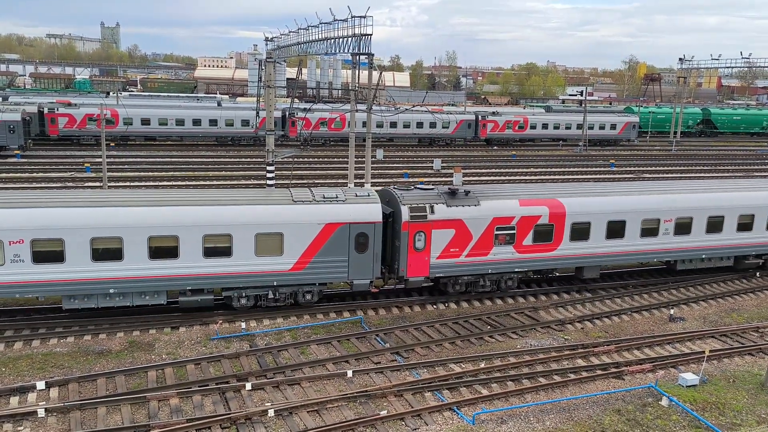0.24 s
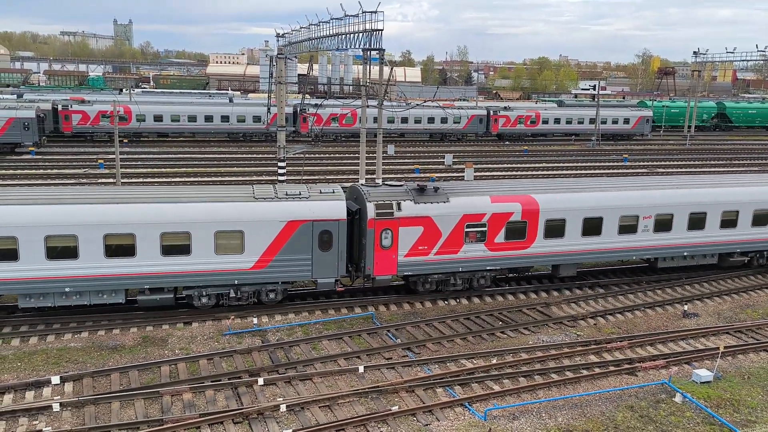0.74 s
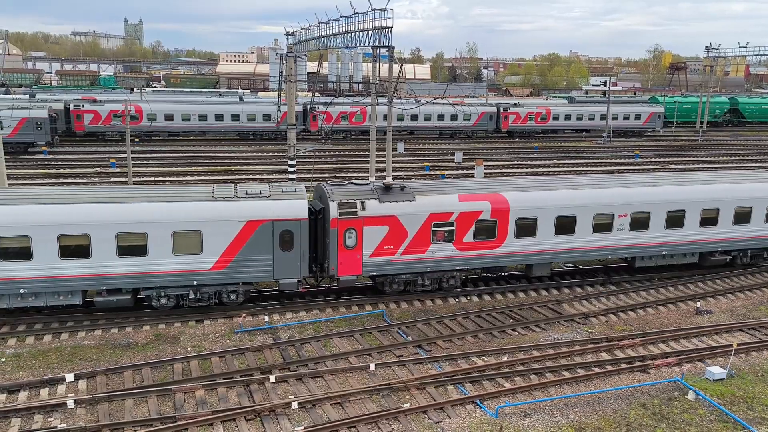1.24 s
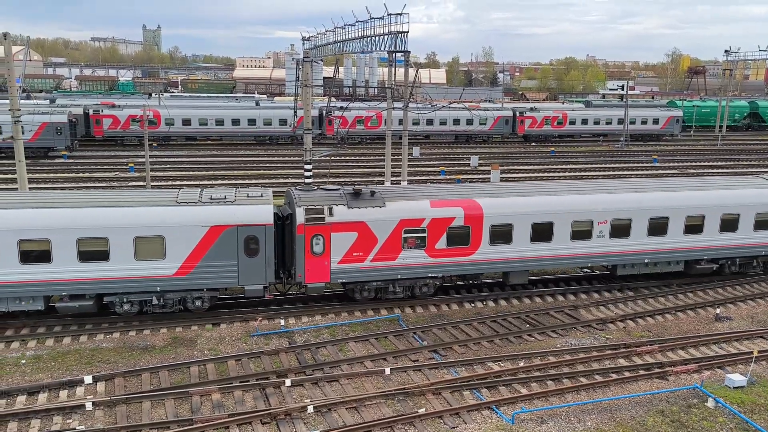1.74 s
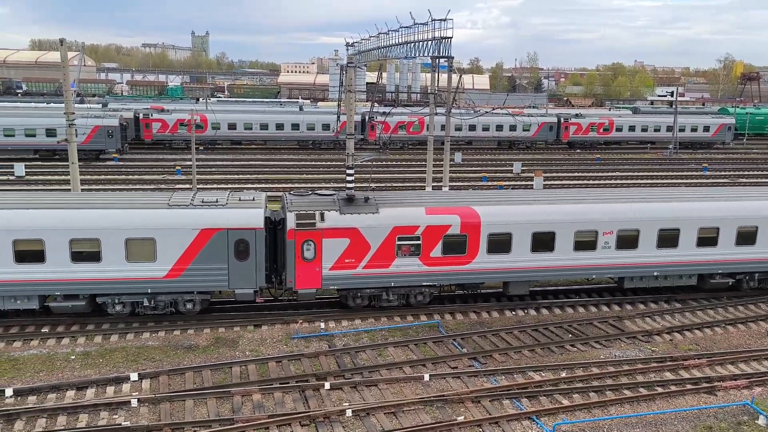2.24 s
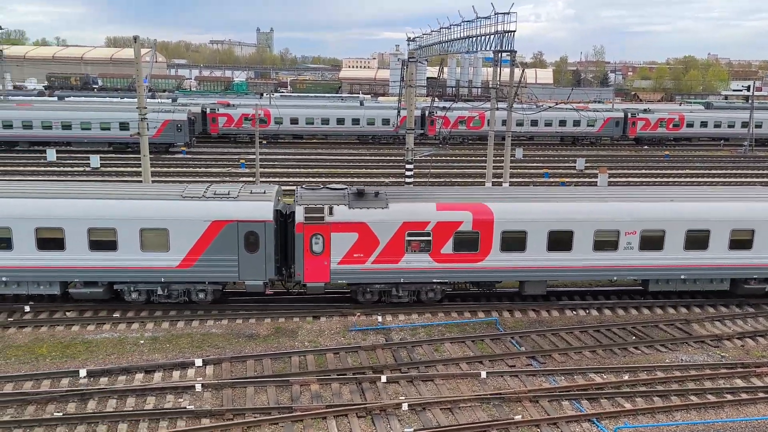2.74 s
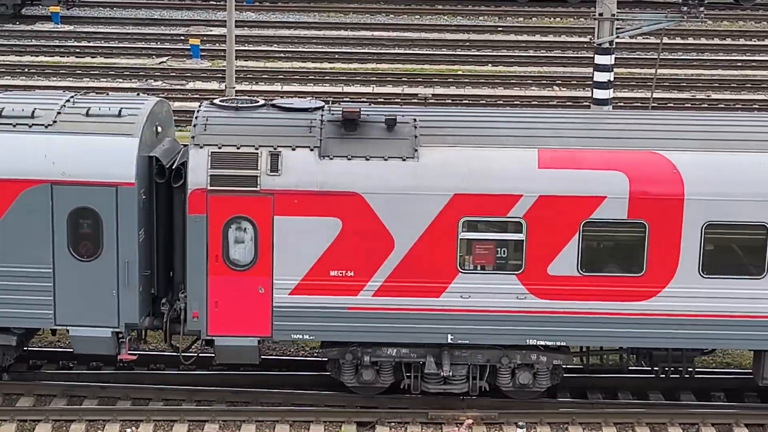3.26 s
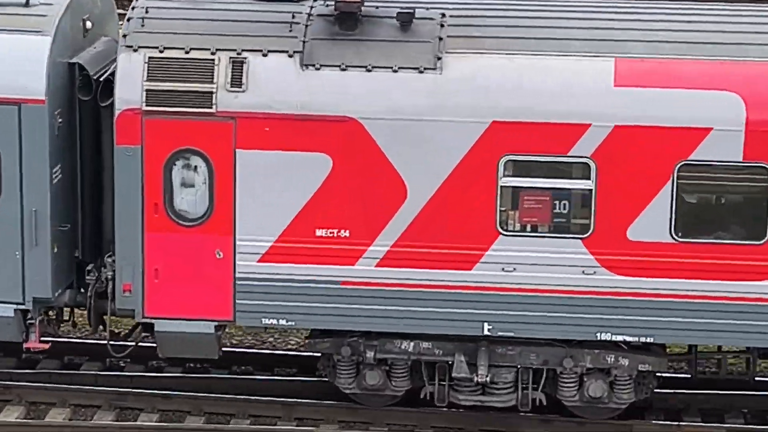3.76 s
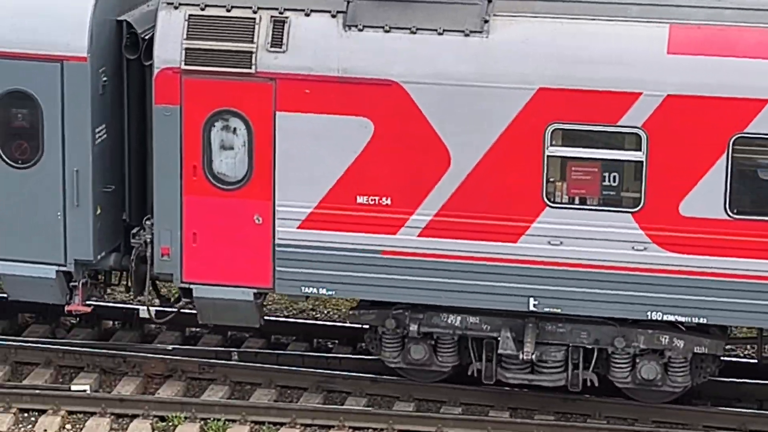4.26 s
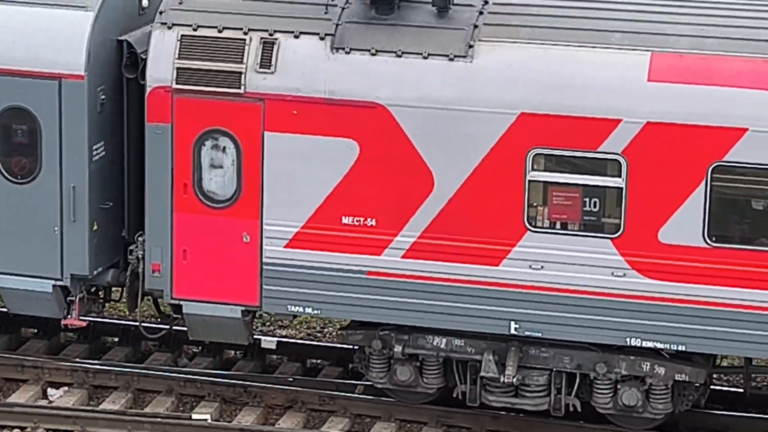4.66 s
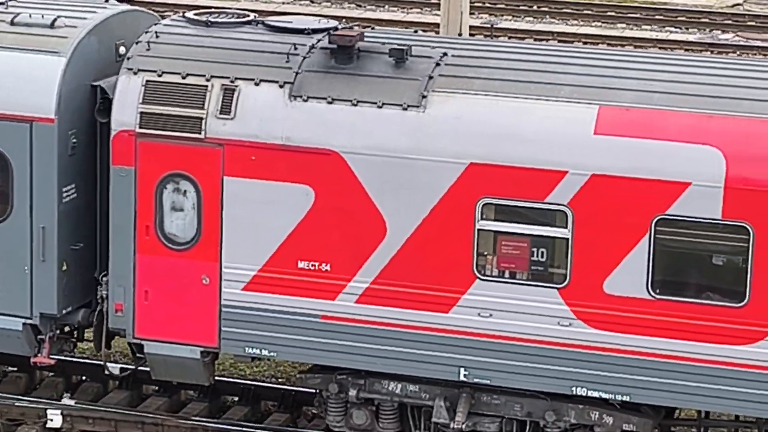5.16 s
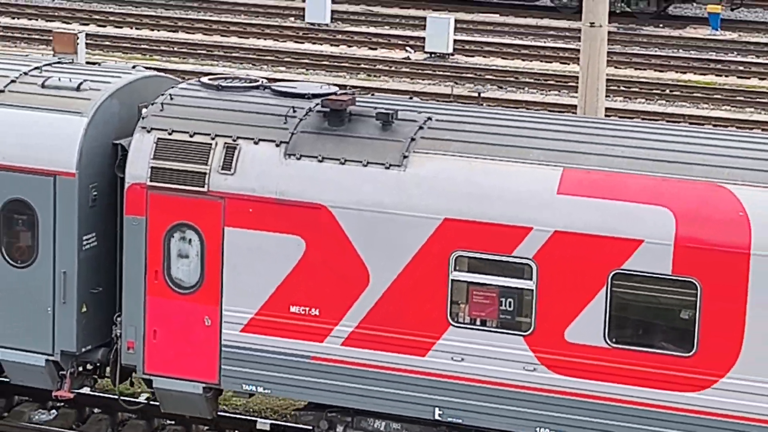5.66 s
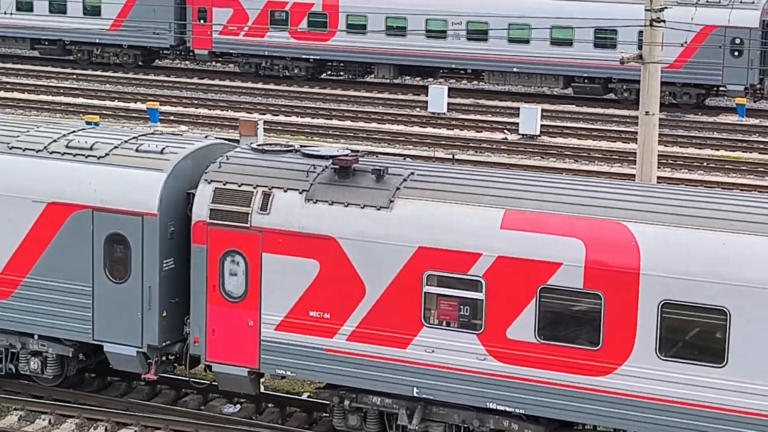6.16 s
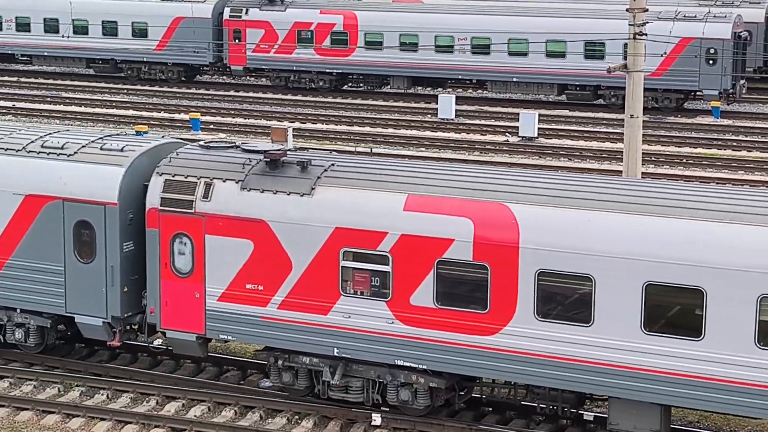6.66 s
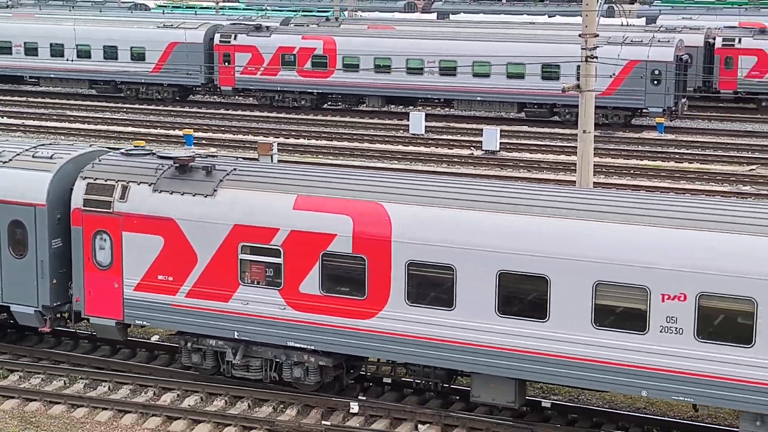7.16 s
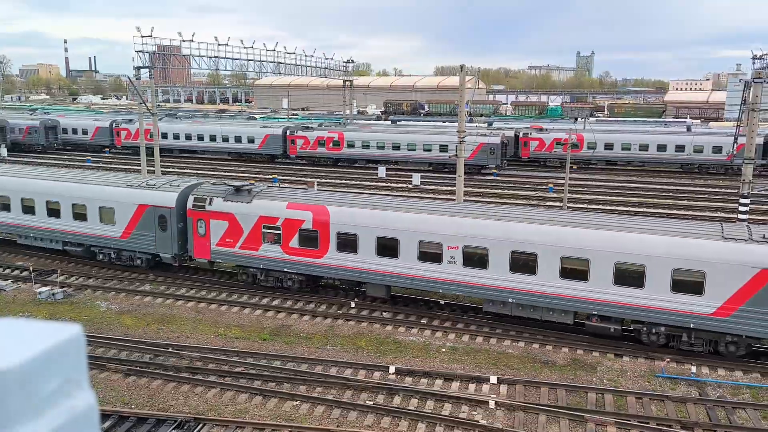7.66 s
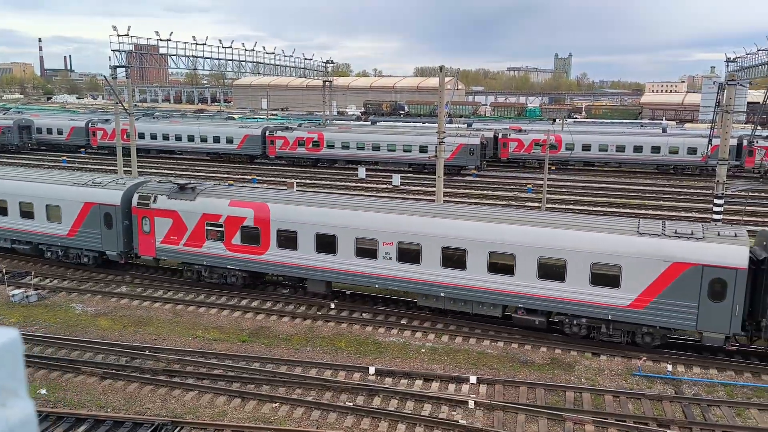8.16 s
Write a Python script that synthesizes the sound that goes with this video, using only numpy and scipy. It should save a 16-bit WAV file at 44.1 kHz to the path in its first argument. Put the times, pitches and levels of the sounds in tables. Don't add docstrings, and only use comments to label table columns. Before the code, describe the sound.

Passenger coaches creep through an open rail yard. High, bright, unsteady wheel squeal and hissy metallic grinding dominate from the start, strongest in the middle, over a low tread rumble and dull knocks at rail joints. Wind buffets a handheld stereo microphone, lumpy and heavy mid-way. Near six seconds a last sharp chirp sounds, then the squeal falls to a faint scrape with rumble and knocks.

```python
import sys
import numpy as np
from scipy import signal
from scipy.io import wavfile
from scipy.ndimage import uniform_filter1d

SR = 44100
rng = np.random.default_rng(int(sys.argv[2]) if len(sys.argv) > 2 else 0)


def voltage_ratio(decibels):
    exponent = np.asarray(decibels, float) / 20
    return 10 ** exponent


def file_out(sig):
    cols = np.atleast_2d(sig).T
    lim = np.clip(cols, -1, 1)
    pcm = np.round(lim * 32767).astype(np.int16)
    wavfile.write(sys.argv[1], SR, pcm)


N = 370881
HOP = 256
T = np.arange(N) / SR
FRAME_T = np.arange(N // HOP + 9) * HOP / SR

# (time [s], pressure [dB], left-right [dB])
FLANGE = [(0.0, -27.5, -4.5), (0.2, -20.5, -5), (0.85, -21, -2), (1.0, -16, -3.5), (1.8, -18, -3),
          (2.2, -18, -3.5), (2.34, -24, -1.5), (2.86, -24.5, -5), (3.0, -17, 1), (4.5, -16.5, -0.5),
          (5.67, -16.5, 1.5), (5.9, -36.5, 7.5), (6.28, -45, 2), (6.7, -33, 0), (7.6, -35, 2.5),
          (7.73, -45, -18), (8.06, -34, -10), (8.41, -42.5, -13.5)]
# (frequency [Hz], level over the grind [dB])
WHEEL_MODES = [
    [(3387, 3), (5066, 3), (5230, 6), (5742, 5), (6245, 3), (6620, 3), (7021, 2), (7216, 3), (7470, 4),
     (7877, 5), (8056, 7), (8812, 9), (9104, 7), (9809, 7), (10190, 7), (11501, 6), (11822, 7), (12053, 5),
     (12469, 7), (12774, 9), (13367, 6), (14451, 8), (15735, 15)],
    [(3186, 5), (3377, 4), (4400, 5), (4942, 2), (5400, 3), (5969, 4), (6300, 4), (6884, 4), (7010, 3),
     (7205, 4), (7400, 3), (7833, 5), (8012, 5), (8787, 8), (9063, 5), (9759, 8), (10762, 6), (11780, 5),
     (12393, 2), (12706, 5), (13316, 5), (14352, 4), (14963, 4), (15251, 6), (15672, 13)],
    [(5164, 5), (6123, 5), (6893, 9), (7094, 7), (7675, 6), (7895, 5), (8121, 8), (8720, 8), (8924, 7),
     (9207, 11), (9783, 9), (9994, 8), (11413, 8), (12791, 6), (13760, 7), (14231, 8), (14704, 10),
     (14991, 9), (15309, 9)],
]
# (frequency [Hz], left-right [dB])
SHADOW = [
    (3200, -8.5),
    (5000, 4),
    (6000, 0.5),
    (7000, -7.5),
    (7900, -40),
    (9100, 17),
    (12500, 16),
    (14500, 6),
]


def evened(x):
    return x / np.sqrt(np.mean(abs(x) ** 2) + 1e-20)


def read(rows, hz):
    f, *columns = np.transpose(rows)
    return np.array([np.interp(np.log(hz + 1), np.log(f), c) for c in columns])


def follow(rows, t):
    s, *columns = np.transpose(rows)
    return [np.interp(t, s, c) for c in columns]


def sides(pan_db):
    left = voltage_ratio(pan_db)
    return np.array([left, 1 + 0 * left]) * np.sqrt(2 / (1 + left ** 2))


def add(mix, s, sound):
    part = mix[..., round(s * SR):][..., :sound.shape[-1]]
    part += sound[..., :part.shape[-1]]


def drift(count, seconds):
    span = max(round(seconds * SR / HOP), 1)
    z = rng.standard_normal((len(FRAME_T), count))
    return evened(uniform_filter1d(uniform_filter1d(z, span, 0), span, 0)).T


def noise(magnitude, same, lag_s, turn_rad=0):
    bins = magnitude.shape[1]
    a, b, c, d = rng.standard_normal((len(FRAME_T), bins, 4)).T
    hz = np.linspace(0, SR / 2, bins)[:, None]
    delay = np.exp(-2j * np.pi * hz * lag_s + 1j * turn_rad)
    left = a + 1j * b
    right = delay * same * left + np.sqrt(1 - same ** 2) * (c + 1j * d)
    size = 2 * bins - 2
    z = np.array([left, right]) * magnitude
    return signal.istft(z, nperseg=size, noverlap=size - HOP)[1][:, :N]


def flanges():
    takeover_s = [
        2.88,
        6.33,
    ]
    # (frequency [Hz], left [dB], right [dB])
    grind_colours = [
        [(1720, -17.5, -22), (4110, -10, -21), (4370, -5, -15), (5530, -5, -16.5), (6630, -0.5, -9.5),
         (7100, -9, 2), (7500, -2.5, -12), (8180, -11.5, -13.5), (9170, -18, -41), (10320, -16.5, -19.5),
         (10950, -10.5, -37), (13160, -15, -18.5), (15700, -20, -38)],
        [(1580, -31, -24.5), (3100, -19.5, -15.5), (3930, -23, -18), (3980, -15.5, -13.5), (5550, -10.5, -11.5),
         (6600, -10.5, -12), (6940, -7.5, 2.5), (7570, -7.5, -13.5), (8490, -9.5, -26.5), (8640, -17.5, -39),
         (9800, -17, -57), (10200, -15, -22.5), (12300, -14.5, -21.5), (15700, -23.5, -28)],
        [(1500, -6.5, -4.5), (3030, -9, -7.5), (4230, -9.5, -12), (5470, -11.5, -3), (6500, -6, 2),
         (7260, -6.5, 2), (8250, -8.5, -8.5), (8660, -20, -19), (8900, -25, -30), (9100, -15, -20),
         (10400, -17, -31), (12400, -14, -21), (15500, -13, -16)],
    ]
    # (right port lag [s], phase regained [rad])
    around = [
        (.00053, 1.84),
        (.00065, 0),
        (.00053, 1.84),
    ]
    # (full pressure [dB], treble share [dB], low grind share [dB], greatest slack [dB])
    full = [
        (-21, 1, -2, 23),
        (-12, -3, -3, 3),
        (-36.5, 1.5, -1.5, 44),
    ]
    # (time [s], half width [s], treble [dB], low grind [dB])
    scrapes = [(0.05, 0.087, -5, 2), (0.65, 0.09, 1, -1.5), (1.1, 0.14, 3, 3.5), (1.4, 0.053, -2, -2.5),
               (1.8, 0.066, 1, 0.5), (2.0, 0.075, -1, -2), (2.35, 0.058, 1.5, 3), (2.76, 0.027, 6, 0.5),
               (2.87, 0.036, 8, 0), (2.92, .03, 2.5, 1), (3.15, 0.11, 5, -1), (3.0, 0.052, 1.5, 4),
               (3.6, 0.085, 3, 3), (3.8, .06, 3, 0), (4.2, 0.099, -1, 3.5), (4.6, .06, 1.5, -1),
               (4.85, 0.084, -1.5, 1), (5.15, .12, -0.5, 1.5), (5.7, 0.073, 1.5, -2), (6.3, 0.07, -5, 0),
               (6.8, 0.046, 2, 1.5), (7.15, 0.13, 1.5, 2), (7.7, .1, -10, 3), (8.0, .06, -1, -2),
               (8.4, 0.17, -10, 0.5)]
    # (frequency [Hz], coherence [ratio])
    likeness = [
        (300, .8),
        (2000, .78),
        (5000, .8),
        (6500, .55),
        (15000, .55),
    ]
    treble_hold, low_hold = 0.39, 0.4
    treble_bearing, main_bearing = .5, .89
    treble_hz, flutter_db = 8700, 1.2

    hz = np.fft.rfftfreq(2048, 1 / SR)
    turn = np.digitize(FRAME_T, takeover_s)
    power = sum(wheel(grind_colours[k], WHEEL_MODES[k], hz) * (turn == k)
                for k in range(len(WHEEL_MODES)))
    pan_db = follow(FLANGE, FRAME_T)[1]
    full_db, high_db, low_db, most_db = np.array(full)[turn].T
    slack_db = np.minimum(full_db - 20 * np.log10(contact(FRAME_T)), most_db)
    s, wide_s, *shift_db = np.transpose(scrapes)
    bumps = np.exp(-((FRAME_T - s[:, None]) / wide_s[:, None]) ** 2)
    high_shift_db, low_shift_db = shift_db @ bumps
    high_db = high_db + treble_hold * slack_db + high_shift_db
    low_db = low_db + low_hold * slack_db + low_shift_db
    low_part = np.clip((4150 - hz) / 300, 0, 1)
    tilt_db = np.outer(hz > treble_hz, high_db) + np.outer(low_part, low_db)

    patches = evened(uniform_filter1d(drift(len(hz), 0.051), 24, 0))
    crowd = drift(len(hz), .4) * (1.0 + hz / 40000)[:, None]
    shape = np.sqrt(power) * voltage_ratio(tilt_db + 1.67 * patches + 3.35 * crowd) * (hz < 15800)[:, None]
    bearing = np.where(hz > treble_hz, treble_bearing, main_bearing)
    shape = shape * sides(np.outer(bearing, pan_db))
    same = np.clip(read(likeness, hz).T, 0, 1)
    sound = noise(shape, same, *np.array(around)[turn].T)
    pressure = contact(T) * voltage_ratio(np.interp(T, FRAME_T, flutter_db * drift(1, .03)[0]))
    return voltage_ratio(3.5) * evened(sound) * pressure


def wheel(grind, modes, hz, width_hz=24, waver_db=2.4):
    f, db = np.transpose(modes)
    peaks = 1 / (1 + (2 * (hz[:, None] - f) / width_hz) ** 2) ** 2
    power = 0.45 + peaks @ voltage_ratio(2 * (db[:, None] + waver_db * drift(len(f), 0.12)))
    power = power * voltage_ratio(2 * read(grind, hz))[:, :, None]
    return power / power[:, (hz > 4000) & (hz < 8500)].sum(1).mean()


def contact(t):
    # (time [s], depth [dB], half width [s])
    lifts = [(0.409, -6, .007), (0.55, -3.5, 0.03), (1.035, -3, 0.025), (1.44, -5, 0.0069),
             (1.565, -6.5, 0.028), (2.72, -1.5, 0.029), (2.829, -5, 0.024), (2.92, -6, 0.01),
             (3.03, -2.5, 0.07), (3.45, -2, 0.084), (3.93, -2, 0.016), (4.3, -3, 0.086), (4.12, 0, 0.026),
             (5.28, -5, 0.029), (5.73, -2, 0.013), (4.07, -2.5, .03), (4.22, -2.5, 0.018), (1.9, -2, 0.044),
             (7.0, -1.5, .06), (7.88, 4.5, .06), (8.0, -3, 0.028)]
    # (time [s], peak [dB], t60 [s])
    slips = [
        (0.418, -24, 0.08),
        (0.64, -23, .3),
        (2.75, -39.5, 0.17),
        (2.86, -23, 0.2),
        (5.746, -17.5, 0.14),
        (6.005, -14.5, 0.15),
        (6.03, -25, 0.74),
    ]
    lift_db = sum(db * np.exp(-((t - s) / wide_s) ** 2) for s, db, wide_s in lifts)
    pressure = voltage_ratio(follow(FLANGE, t)[0] + lift_db)
    for s, db, t60_s in slips:
        onset = np.clip((t - s) / 0.0057, 0, 1)
        pressure = np.hypot(pressure, voltage_ratio(db - 60 * abs(t - s) / t60_s) * onset)
    return pressure


def squeals():
    # (time [s], length [s],
    # pitch [Hz], level [dB], line width [Hz])
    sung = [(0.15, 0.92, 5230, -32, 12), (0.19, 0.56, 7021, -20, 16.3), (0.38, 0.64, 12160, -28, 24.4),
            (0.6, 0.3, 7878, -24, 22), (0.2, 0.97, 6010, -28.5, 30), (0.83, 1.05, 5067, -29, 14.2),
            (1.8, 1.1, 15000, -37, 20), (0.13, 0.54, 4251, -33, 12.1), (7.85, 0.4, 7800, -40, 60),
            (0.82, 1.1, 6245, -30, 45), (0.94, 0.85, 7290, -21, 110), (1, 0.5, 6000, -31, 65),
            (2.08, 0.36, 3000, -36, 16), (2.998, 0.44, 7000, -20.5, 40), (5.75, 0.5, 5970, -44, 34),
            (3.52, 0.45, 4942, -21.5, 22), (3.45, 0.92, 3187, -31, 12.03), (3.55, 0.6, 4400, -25, 150),
            (1.66, 0.62, 4650, -27, 160), (0.76, 0.68, 4650, -31, 190), (3.5, 0.5, 10300, -27.5, 23.6),
            (2, .5, 13367, -31, 20), (4.5, 0.13, 6983, -18, 29.7), (4.5, 0.4, 7290, -22, 90),
            (4.2, 0.54, 5970, -28, 15), (5.0, 0.38, 5970, -17, 8), (5.5, 0.36, 5970, -27, 23.6),
            (5.28, 0.52, 14330, -25, 70), (5.5, 0.75, 6962, -30.5, 35), (5.54, 0.42, 8500, -32.5, 29.4),
            (5.5, 0.72, 5065, -37, 30), (6.5, 1.2, 5164, -38, 80), (6.5, 1.29, 6123, -37, 60),
            (7.1, 0.43, 4399, -45, 70), (7.5, 0.38, 7093, -40, 40),
            (6, 0.47, 6893, -39, 50), (6.55, 0.45, 5164, -37, 70), (5.95, .6, 5164, -45, 60),
             (6.02, 0.42, 5970, -42, 30), (4.0, 0.58, 3187, -33, 14), (.95, 0.41, 3000, -33, 300),
             (4.95, .3, 2100, -38, 230), (5.45, 0.25, 6884, -23, 120)]
    lone_modes_hz = [2100, 3000, 4250, 4650, 6010, 6300, 6962, 7290, 10140]
    lock_hz = 30
    pitch_drift = .4
    rise, fall = .12, .4

    out = np.zeros((2, N))
    modes_hz = np.array([f for modes in WHEEL_MODES for f, _ in modes] + lone_modes_hz)
    for s, length_s, near_hz, db, wide_hz in sung:
        hz = modes_hz[abs(modes_hz - near_hz).argmin()]
        t = np.arange(round((length_s + .1) * SR)) / SR
        knots_s = np.arange(400) / wide_hz / 2
        chance = rng.standard_normal((5, 400))
        a, b, c, d = (np.interp(t, knots_s, z) for z in chance[:4])
        hz = hz + pitch_drift * wide_hz * np.interp(t, 12 * knots_s, chance[4])
        left = a + 1j * b
        right = .85 * left + .5 * (c + 1j * d)
        wander = lock_hz / wide_hz + np.array([left, right])
        line = evened((wander * np.exp(2j * np.pi * np.cumsum(hz) / SR)).real)
        ramp = np.minimum(t / t[-1] / rise, (1 - t / t[-1]) / fall)
        swell = np.sin(np.pi / 2 * np.minimum(ramp, 1)) ** 2
        add(out, s, voltage_ratio(db - 5.0) * line * swell * sides(read(SHADOW, near_hz)))
    return out


def pips():
    # (time [s], length [s], frequency [Hz], level [dB])
    catches = [(0.31, .03, 7021, -21), (0.368, .022, 7021, -15), (0.389, .014, 7021, -13),
               (0.417, .022, 7021, -10), (0.405, .006, 7021, -30), (0.44, .014, 7021, -19),
               (0.572, 0.023, 7021, -19), (2.867, 0.017, 7350, -19), (5.752, 0.013, 7760, -18),
               (6.004, 0.022, 7000, -13)]
    edge_s, beat_hz = .004, 110
    out = np.zeros((2, N))
    for s, length_s, hz, db in catches:
        t = np.arange(round((length_s + .03) * SR)) / SR
        tone = np.cos(2 * np.pi * hz * t) + .3 * np.cos(2 * np.pi * (hz + beat_hz) * t)
        edge = np.minimum(t / edge_s, 1) * np.exp(-np.maximum(t - length_s, 0) / edge_s)
        add(out, s, voltage_ratio(db) * tone * edge * sides(read(SHADOW, hz)))
    return out


def joints():
    # (time [s], peak [dB], bright share [dB], rail pitch [ratio])
    knocks = [(0.108, -26.5, -15, 1.1), (0.302, -23, -25, 1.3), (0.568, -27, -15.5, 1.1),
              (0.647, -21, -20.5, .8), (0.826, -24, -11.5, 0.77), (0.985, -33, -11, 0.96),
              (1.09, -27, -20, 1.2), (1.159, -30, -11, .9), (1.25, -26, -18, 1.2),
              (1.456, -19.5, -23, 0.83), (1.848, -20, -25, 0.84), (2.659, -25.5, -13, .8),
              (2.92, -34, -10, 1), (3.597, -39, 4.5, 1.8), (5.683, -20, -18, 0.88), (5.897, -37, -3.5, 1.3),
              (6.104, -29, -10, 1.37), (6.309, -41.5, -5, 1.5), (6.347, -32.5, -6.5, 0.94),
              (6.5, -35.5, -10, 0.88), (6.744, -33, -1, 1.14), (6.81, -42, -5, 0.94),
              (7.155, -32.5, -11, 0.96), (7.201, -25.5, -15.5, 1.1), (7.624, -26, -12, 1.04),
              (7.727, -33, -8.5, 0.76), (7.85, -34.5, -8.5, 1.1), (8.008, -27, -25, 0.75),
              (8.198, -47, -9, 1.3), (8.283, -25, -12, 1.02), (8.384, -32, -9, 0.83)]
    # (frequency [Hz], level [dB], t60 [s])
    bogie = [(343, -2, 0.023), (381, -2, 0.089), (515, -2, 0.018), (738, -16.5, 0.031)]
    # (frequency [Hz], level [dB], t60 [s])
    rail = [(800, 3, .008), (1100, 4, .008), (1400, 5, .012), (1800, 1, .007), (2400, -1, .005),
            (3000, -5, .004)]
    rattle_s, click_s = .045, .022

    def ring(body, scale):
        return sum(voltage_ratio(db - 60 * t / t60_s)
                   * np.sin(2 * np.pi * f * rng.uniform(0.887, 1.142) * scale * t)
                   for f, db, t60_s in body)

    out, t = np.zeros((2, N)), np.arange(9000) / SR
    rattle = np.exp(-t / rattle_s) * np.minimum(t / .006, 1)
    click = np.exp(-t / click_s) * np.minimum(t / .002, 1)
    for s, db, bright_db, pitch in knocks:
        blow = rng.standard_normal(len(t))
        low = signal.fftconvolve(ring(bogie, 1), blow * rattle)[:len(t)]
        high = signal.fftconvolve(ring(rail, pitch), blow * click)[:len(t)]
        knock = low / abs(low).max() + voltage_ratio(bright_db + 14.5) * high / abs(high).max()
        add(out, s, voltage_ratio(db) * np.array([knock, np.roll(knock, 12)]))
    return out


def rolling():
    # (frequency [Hz], level [dB])
    rumble = [(50, -15), (120, -3), (250, -0.5), (380, 2.5), (520, -11.5), (900, -17.5), (1600, -16),
              (3000, -23), (9000, -29)]
    # (time [s], level [dB])
    near = [(0, 0), (1.2, 1), (2.1, 1), (3.0, -1), (3.8, 2), (4.55, -3), (5.0, 0), (5.2, -2), (6.3, 1),
            (7.3, 0), (7.55, -2), (7.75, 0), (8.15, -3), (8.41, -1)]
    hz = np.fft.rfftfreq(1024, 1 / SR)
    patches = evened(uniform_filter1d(drift(len(hz), .05), 8, 0))
    shape = voltage_ratio(read(rumble, hz).T + 1.6 * patches + 1.8 * drift(1, .08))
    sound = evened(noise(np.array([shape, shape]), 0.7, 0.000269))
    return voltage_ratio(-31) * sound * voltage_ratio(follow(near, T)[0])


def wind():
    # (frequency [Hz], left [dB], right [dB])
    buffet = [(30, -95, -120), (63, -24, 8.5), (120, -5, 20), (224, 0, 6.5), (414, -8, 4),
              (823, -28.5, -49), (1880, -68, -78)]
    hz = np.fft.rfftfreq(1024, 1 / SR)
    gust = gusts()
    reach_db = 0.41 * np.log2(hz[:, None] / 200 + 1) * (20 * np.log10(gust)[:, None] + 26) * 2
    shape = voltage_ratio(read(buffet, hz)[:, :, None] + reach_db)
    shape = shape / np.sqrt((shape ** 2).sum(1, keepdims=True))
    lumps_db = 2.2 * uniform_filter1d(rng.standard_normal((N, 2)), 500, 0).T * np.sqrt(500)
    push = voltage_ratio(lumps_db) * np.array([np.interp(T, FRAME_T, g) for g in gust])
    return voltage_ratio(3.5) * evened(noise(shape, 0, 0)) * push


def gusts():
    # (start [s], length [s], peak [dB], left-right [dB])
    blasts = [(0.09, .1, -31, -15), (0.44, 0.058, -27.5, -25), (1.22, .05, -28, -10), (1.64, .02, -33, -10),
              (2.468, 0.14, -28.5, 25), (2.633, 0.067, -25, 20), (2.782, 0.03, -18, 13),
              (2.89, 0.028, -16.5, 2.5), (2.982, .03, -28, 8), (3.05, 0.03, -27.5, -23),
              (3.105, 0.03, -22.5, 9), (3.29, 0.04, -21, 11), (3.35, 0.072, -18.5, 11),
              (3.458, 0.057, -18, 11), (3.54, 0.042, -26, 8), (3.718, 0.16, -26.5, 3.5),
              (3.933, 0.052, -20, 27), (4.03, 0.052, -21, 27), (4.181, 0.063, -19.5, 23),
              (4.27, .07, -21, 26), (4.389, 0.024, -22.5, 15), (4.678, 0.094, -28.5, 6),
              (4.82, 0.074, -27.5, 8), (5.022, 0.03, -24, 25), (5.085, 0.022, -25.5, 11),
              (5.288, .05, -31, -7), (5.379, 0.09, -24.5, -7), (5.69, 0.08, -27.5, -20),
              (5.83, 0.063, -26, -11), (5.96, 0.05, -26.5, -23), (6.024, 0.013, -20.5, -15),
              (6.141, .03, -28, -4), (6.253, 0.11, -27.5, 5), (6.44, 0.071, -32, 8),
              (6.614, .02, -28.5, -2), (6.7, .02, -27.5, -1), (6.895, 0.07, -26.5, 5), (7.0, .06, -27.5, 7),
              (7.1, .04, -27, 6), (7.272, .035, -27, -1), (7.4, 0.03, -31, -19), (7.48, 0.018, -34, 0),
              (7.59, 0.02, -24, -13), (7.7, .04, -33, -5), (7.858, .03, -33, -5), (8.05, .02, -35, 0),
              (8.377, .04, -28.5, -2)]
    # (time [s], level [dB], left-right [dB])
    breeze = [
        (0, -36, -17),
        (.6, -36, -6),
        (2.3, -42.5, -32),
        (3.0, -32.5, 12),
        (4.4, -29.5, 6),
        (4.55, -51, -32),
        (5.8, -35.5, 6),
        (6.7, -34.5, 0),
        (8.41, -44, -12),
    ]
    rise_db_per_s, fall_db_per_s = 480, 380
    level_db, pan_db = follow(breeze, FRAME_T)
    power = (voltage_ratio(level_db) * sides(pan_db)) ** 2
    for s, length_s, db, pan_db in blasts:
        before_s = np.maximum(s - FRAME_T, 0)
        after_s = np.maximum(FRAME_T - s - length_s, 0)
        away_db = rise_db_per_s * before_s + fall_db_per_s * after_s
        power = power + (voltage_ratio(db - away_db) * sides(pan_db)[:, None]) ** 2
    return np.sqrt(power)


def ducking():
    from_db, share = -24.5, 0.72
    over_db = np.maximum(20 * np.log10(gusts()) - from_db, 0)
    return np.array([np.interp(T, FRAME_T, voltage_ratio(-share * uniform_filter1d(o, size=7)))
                     for o in over_db])


def scene():
    steel = (flanges() + squeals() + pips()) * ducking()
    return steel + rolling() + voltage_ratio(5.5) * joints() + wind()


def masked(x, under_db=-7.8, spread_hz=750, from_hz=1300):
    hz, _, z = signal.stft(x, SR, nperseg=2048)
    power = uniform_filter1d(uniform_filter1d(abs(z) ** 2, size=5, axis=1), size=3, axis=2)
    slope = np.exp(-abs(hz[:, None] - hz) / spread_hz) * (hz > from_hz) * (hz < 15700)
    cover = slope / slope.sum(1, keepdims=True) @ power.max(0)
    keep = (power > cover * voltage_ratio(2 * under_db)) | (hz < from_hz)[:, None]
    keep = keep & (hz < 15850)[:, None]
    return signal.istft(z * keep, SR, nperseg=2048)[1][:, :N]


def roll_off(x):
    return signal.sosfilt(signal.butter(12, 16300, fs=SR, output="sos"), x)


def record(dry):
    knee, headroom = .5, .2
    cut = signal.sosfilt(signal.butter(4, 68, "high", fs=SR, output="sos"), dry)
    straight = np.clip(cut, -knee, knee)
    soft = straight + headroom * np.tanh((cut - straight) / headroom)
    return roll_off(masked(soft))


dry = scene()
out = record(dry)
file_out(out)
```